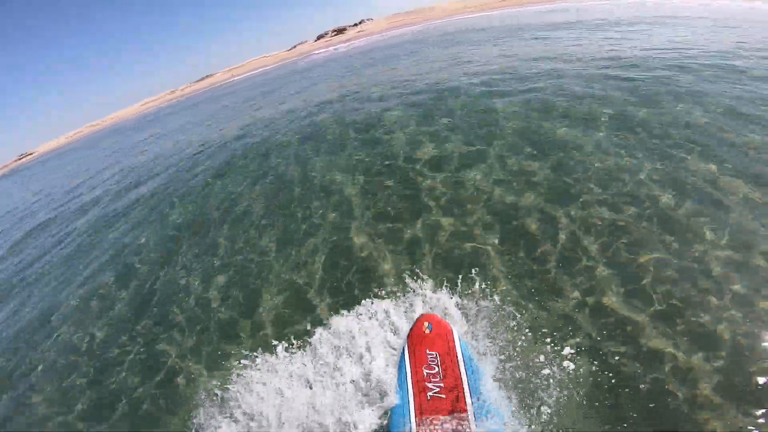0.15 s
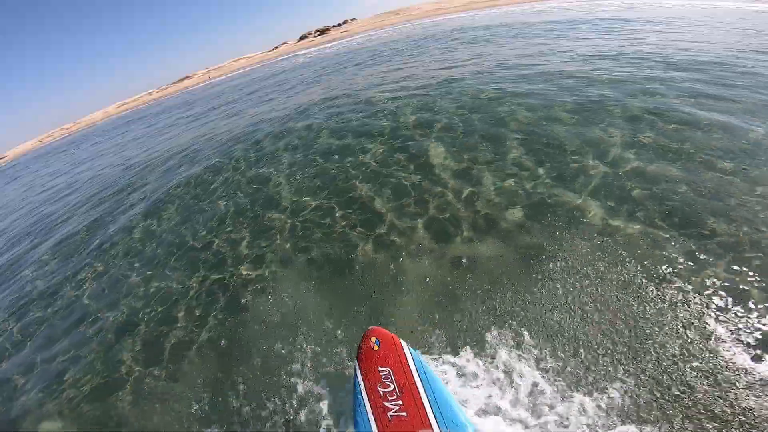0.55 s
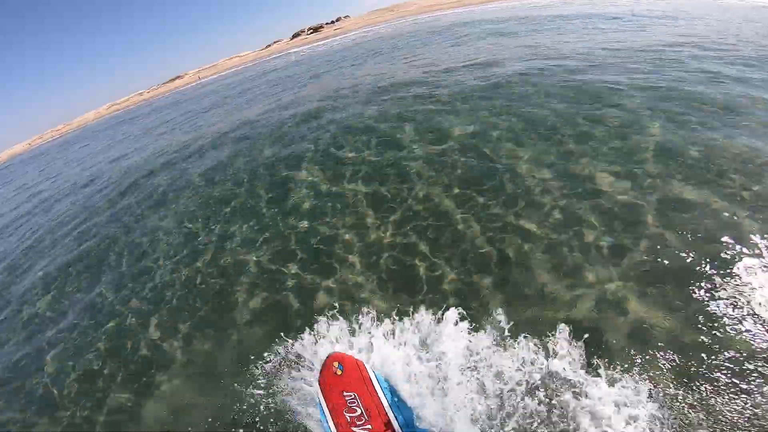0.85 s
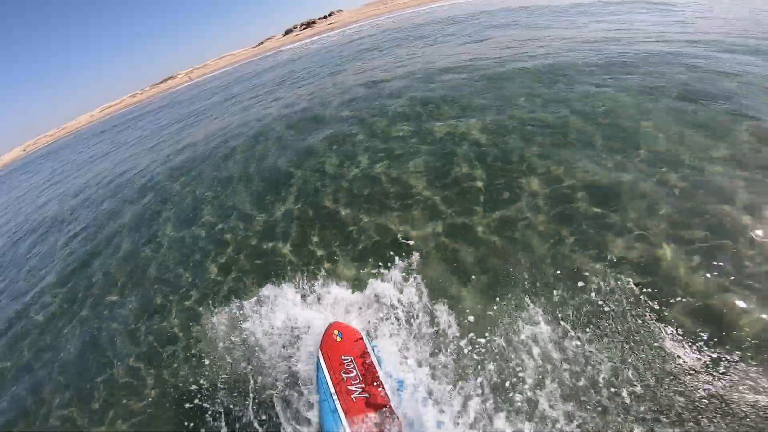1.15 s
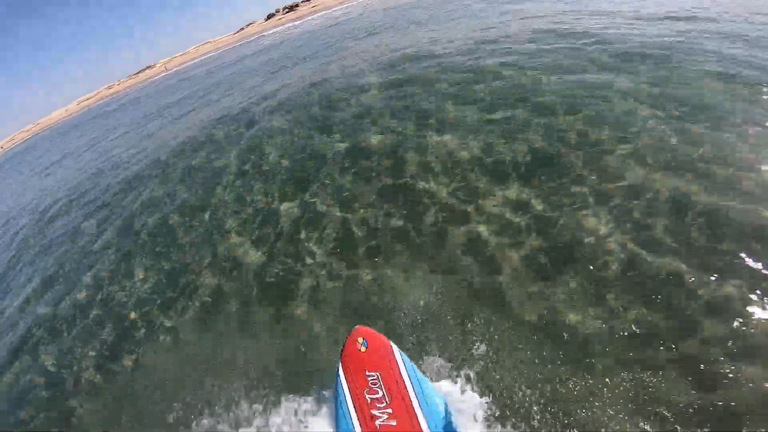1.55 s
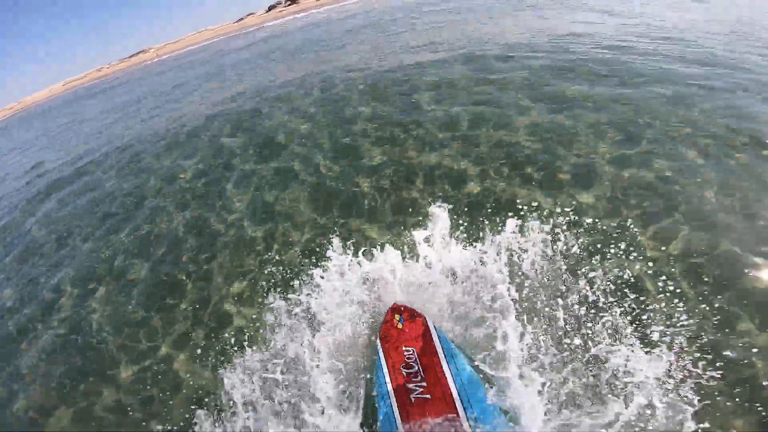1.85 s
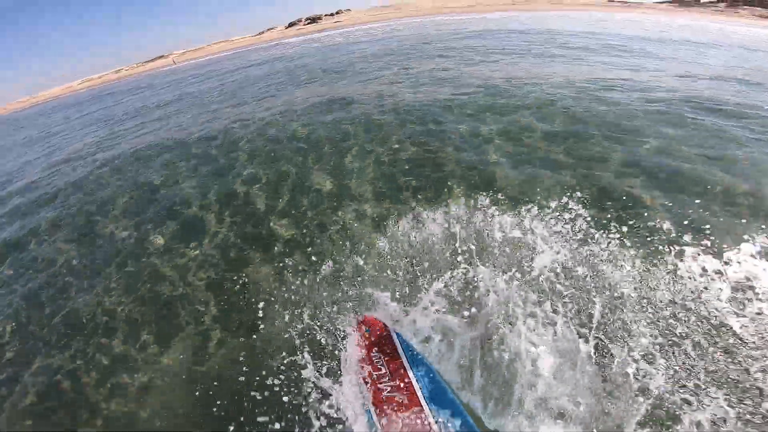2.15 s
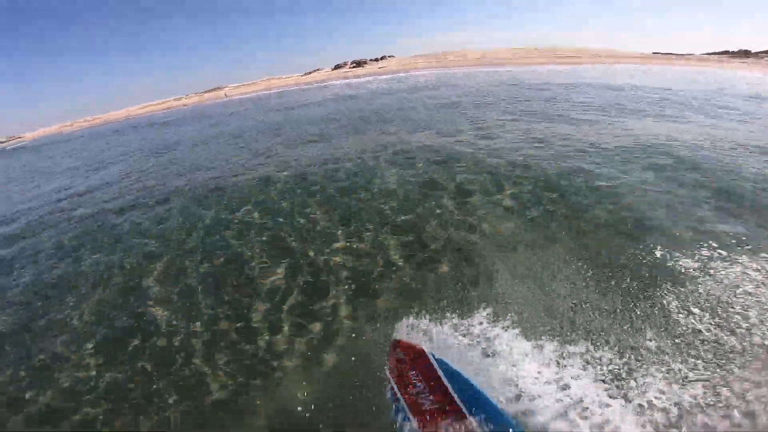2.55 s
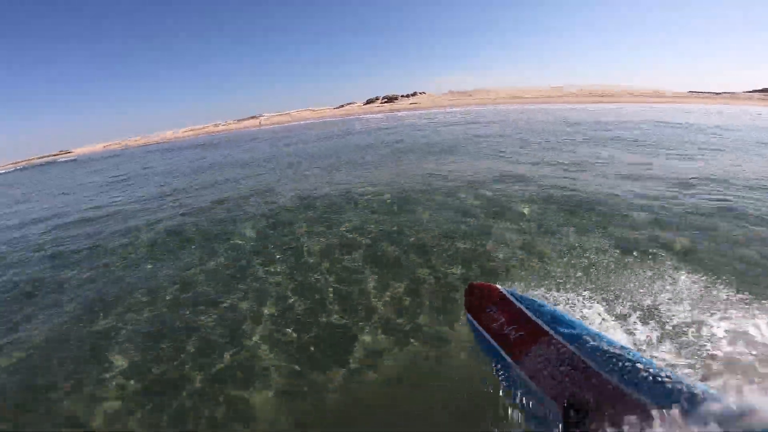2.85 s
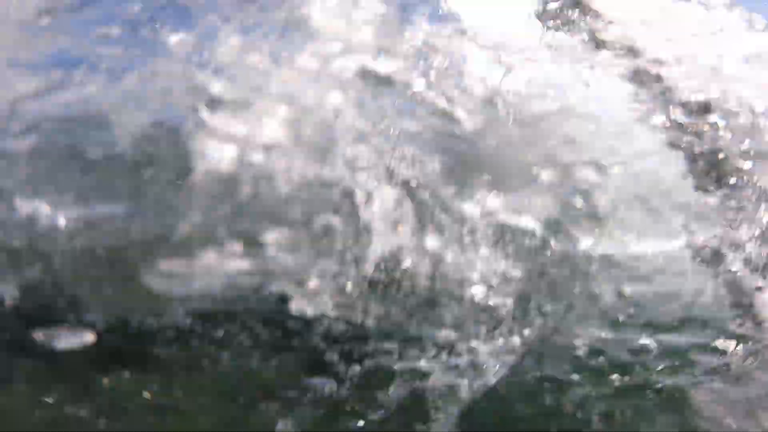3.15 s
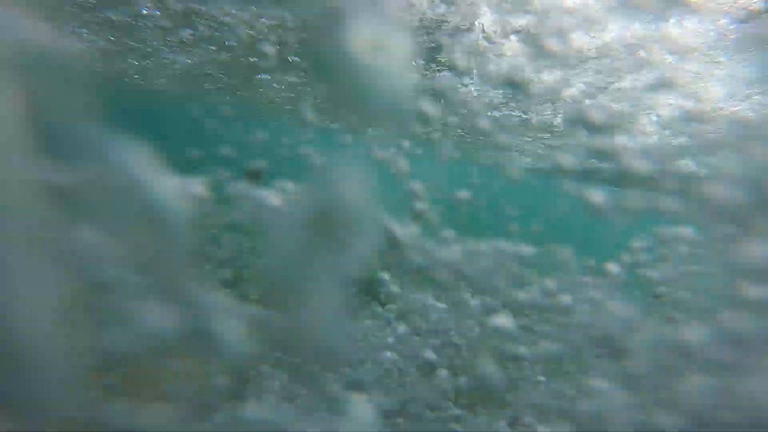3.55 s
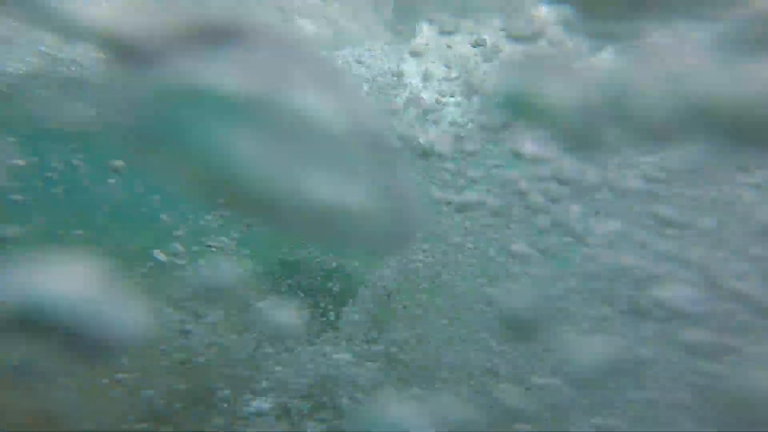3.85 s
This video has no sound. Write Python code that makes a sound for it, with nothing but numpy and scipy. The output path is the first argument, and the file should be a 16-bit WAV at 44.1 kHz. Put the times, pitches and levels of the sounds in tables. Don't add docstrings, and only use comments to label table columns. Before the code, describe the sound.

A surfboard skims shallow sea, its wake churning under steady wind buffeting a sealed onboard camera. Hollow wavelet smacks hit the hull irregularly, strongest near 0.05, 1.2 and 1.75 s. Wind eases towards 3 s. Then a fall: surging water, sharp slaps and a roaring air-pocket boom sinking in pitch. At 3.55 s a heavy thump submerges everything into muffled gurgling, knocks, thinning froth and small ringing bubbles until 4 s.

```python
import sys
import numpy as np
from scipy import signal
from scipy.fft import rfft, irfft
from scipy.io import wavfile

SR = 44100
rng = np.random.default_rng(int(sys.argv[2]) if len(sys.argv) > 2 else 0)


def transcribe(signal):
    frames = np.atleast_2d(signal).T
    limited = np.clip(frames, -1, 1)
    pcm = np.round(limited * 32767).astype(np.int16)
    wavfile.write(sys.argv[1], SR, pcm)


def voltage_ratio(level):
    return 10 ** (np.asarray(level, float) / 20)


N = 176400
T = np.arange(N) / SR
HZ = np.maximum(np.fft.rfftfreq(N, 1 / SR), 1)
FALL = 3 * SR
DIVE_S, CLOSE_S = 3.548, 0.011
SUNK_S = 3.59

# [t/s, level/dB]
WIND = [
    (0.0, -22.5),
    (0.17, -22.5),
    (0.21, -22.5),
    (2.58, -33.5),
    (3.01, -34.5),
    (3.04, -30.5),
    (3.25, -24),
    (3.36, -17),
    (3.5, -18),
]
# [f/Hz, level/dB per Hz]
WIND_COLOUR = [(18, -13.5), (35, -26.5), (70, -7.5), (150, -3.5), (300, -2), (500, -7), (900, -13),
               (2000, -58)]
# [f/Hz, level/dB per Hz]
SHUDDER_COLOUR = [(15, -10), (35, -3.5), (70, -8.5), (120, -25.5)]
# [t/s, level/dB]
MIST = [
    (0.0, -104),
    (0.2, -99),
    (0.4, -93),
    (0.6, -97),
    (0.85, -104),
    (0.93, -94),
    (1.1, -91),
    (1.35, -93),
    (1.45, -110),
]
# [t/s, peak level/dB]
OVERLOAD_TICKS = [(3.5605, -61), (3.567, -60.5), (3.581, -67), (3.5865, -55), (3.5975, -58.5), (3.608, -61),
                  (3.642, -68)]
# [t/s, level/dB, spray share level/dB]
WAKE = [(0.0, -22.5, -20), (0.02, -29, -20), (0.09, -28, -20.5), (0.7, -26, -22), (0.88, -24, -23.5),
        (1.27, -24.5, -22), (1.33, -27.5, -19), (1.61, -27.5, -22.5), (1.76, -23, -25.5),
        (2.0, -28.5, -18.5), (2.77, -26.5, -17), (2.78, -26.5, -16), (3.04, -23, -20.5)]
# [t/s, level/dB, spray share level/dB]
PLUNGE = [
    (3.055, -22.5, -22),
    (3.065, -14, -26.5),
    (3.098, -18.5, -18),
    (3.108, -20, -26),
    (3.14, -16.5, -24),
    (3.291, -20.5, -28.5),
    (3.345, -19.5, -25),
    (3.5, -19, -27),
    (3.536, -14, -27),
]
# [f/Hz, level/dB per Hz]
WAKE_COLOUR = [(100, -23), (300, -8.5), (650, 1), (1350, -1), (1750, -9.5), (2300, -20.5), (3000, -45.5),
               (3800, -61.5)]
# [f/Hz, level/dB per Hz]
SPRAY_COLOUR = [(1500, -7.5), (2200, 1.5), (3200, -7.5), (3800, -16), (5700, -13.5), (7400, -24),
                (9300, -30.5), (11500, -58.5)]
# [t/s, peak level/dB, f/Hz]
SMACKS = [(0.053, -8, 571), (0.35, -13, 670), (0.44, -15, 622), (0.677, -18, 417), (0.966, -15, 773),
          (1.131, -13, 1200), (1.22, -9, 751), (1.686, -10, 616), (1.751, -5, 514), (2.377, -15, 746),
          (3.007, -18, 622)]
# [t/s, level/dB]
FROTH = [
    (3.55, -35),
    (3.565, -34.5),
    (3.61, -35.5),
    (3.65, -42.5),
    (3.69, -36.5),
    (3.71, -43.5),
    (3.75, -44),
    (3.8, -54),
    (3.9, -49),
    (4.0, -66),
]
# [f/Hz, level/dB per Hz]
FROTH_COLOUR = [(600, -6), (1000, 5), (1800, -11.5), (2600, -14.5), (3400, -18), (4400, -18), (5200, -29),
                (6000, -51)]
# [t/s, f/Hz, peak level/dB, time to fall 60 dB t/s]
BUBBLES = [(3.564, 1570, -35, .03), (3.565, 3470, -26, 0.04), (3.566, 4120, -25.5, 0.03),
           (3.567, 2800, -29, 0.035), (3.574, 3440, -38, .12), (3.578, 4520, -37.5, 0.14),
           (3.604, 3480, -41.5, .08), (3.572, 4926, -46, 0.13), (3.605, 4250, -43.5, 0.16),
           (3.61, 2376, -27, 0.035), (3.63, 3870, -42, 0.077), (3.66, 1890, -33, 0.029),
           (3.668, 2752, -31.5, 0.027), (3.679, 4200, -49, 0.27), (3.705, 4200, -48.5, 0.17),
           (3.693, 3200, -44, 0.017), (3.711, 3150, -48, .02), (3.699, 4780, -54, 0.065),
           (3.686, 2200, -35.5, 0.022), (3.678, 4770, -55.5, 0.046), (3.726, 2500, -39, 0.017),
           (3.737, 2750, -38, 0.02), (3.752, 4180, -51, 0.06), (3.816, 4000, -64, 0.037),
           (3.853, 3970, -52, .03), (3.862, 2700, -48, .02), (3.879, 4830, -55, .04),
           (3.859, 3490, -34, 0.021), (3.895, 3900, -51, 0.054), (3.9, 4700, -57, 0.056),
           (3.9, 8060, -64, 0.061), (3.912, 2900, -53, .03), (3.934, 2480, -29, 0.014),
           (3.935, 4240, -58, 0.057)]
# [t/s, level/dB]
GURGLE = [
    (3.45, -15),
    (3.464, -9),
    (3.634, -3.5),
    (3.66, -16.5),
    (3.766, -10.5),
    (3.862, -19),
    (3.876, -11),
    (3.972, -20),
    (4.0, -14),
]
# [f/Hz, level/dB per Hz]
GURGLE_COLOUR = [(18, -27), (50, -3), (120, -1.5), (250, -6), (520, -6.5), (640, -23.5), (1300, -40.5),
                 (2600, -64)]
# [t/s, f/Hz, level/dB, clear tone share level/dB]
POCKET = [
    (3.05, 524, -56, -15),
    (3.15, 480, -24, 7),
    (3.27, 422.7, -18.5, -16.5),
    (3.335, 258.6, -16.5, 8.5),
    (3.41, 257.8, -10, 15),
    (3.44, 260.4, -12.5, -22),
    (3.54, 230.6, -10, -11),
    (3.6, 246, -15.5, 0),
    (3.65, 242.7, -67.5, -1),
]
# [t/s, peak level/dB, brightness level/dB]
SLAPS = [(3.061, -22, -4), (3.0765, -27, -13), (3.088, -23, -8), (3.116, -17.5, -5), (3.135, -23, -9),
         (3.195, -13, -10), (3.265, -18, -11), (3.3376, -21, -10), (3.384, -27, 2), (3.442, -26, -4),
         (3.4814, -8, -9.5), (3.496, -10.5, -10), (3.517, -11, -22), (3.523, -11, -25), (3.532, -22, -16),
         (3.542, -9, -11), (3.5548, -12, -4), (3.564, -21.5, 3), (3.5804, -24, -21), (3.5861, -25.5, -13),
         (3.598, -26, -7), (3.6012, -17, -10), (3.606, -20, -9), (3.627, -24, -10), (3.669, -27, -4),
         (3.686, -24.5, -12), (3.718, -25, -16), (3.726, -26.5, -8), (3.733, -24, -7), (3.7484, -13, -14),
         (3.7555, -14.5, -15.5), (3.7788, -11, -14), (3.7917, -26, -15.5), (3.8, -22.5, -18.5),
         (3.843, -33.5, -14), (3.8588, -25, -7), (3.875, -34, -5), (3.896, -33, -14), (3.912, -24.5, -14),
         (3.919, -35, -12), (3.958, -42, -8)]
# [f/Hz, level/dB per Hz]
SLAP_COLOUR = [(200, -37), (700, 20), (1500, -3.5), (2500, -20), (4000, -35), (6000, -48.5)]
# [f/Hz, level/dB per Hz]
CRACK_COLOUR = [(700, -5), (1800, 4), (3200, -6), (4800, -15), (6400, -15.5), (8600, -32), (10500, -40),
                (16000, -66.5)]
# [t/s, f/Hz, peak level/dB, time to fall 60 dB t/s]
THUMPS = [(3.06, 122, -18, 0.13), (3.13, 44.7, -16, 0.11), (3.225, 30, -16.5, 0.23),
          (3.555, 58, -0.5, 0.14), (3.59, 120, -11.5, 0.45), (3.61, 362, -10, .2), (3.582, 520, -9, .06),
          (3.695, 204, -11, 0.048), (3.745, 440, -14.5, 0.235), (3.82, 118.8, -8, 0.3),
          (3.875, 127.3, -5.5, 0.22), (3.78, 300, -7.5, .08), (3.862, 590, -19, 0.071),
          (3.908, 670, -19.5, 0.068), (3.9, 352, -16, 0.13), (3.938, 323, -7, 0.11),
          (3.935, 118, -7.5, 0.14), (3.98, 189.7, -8.5, 0.43)]


def rms_one(x):
    return x / np.sqrt(np.mean(x ** 2) + 1e-20)


def in_time(rows):
    s, *columns = np.transpose(rows)
    return [np.interp(T, s, column) for column in columns]


def colour(points):
    hz, db = np.transpose(points)
    return voltage_ratio(np.interp(np.log(HZ), np.log(hz), db))


def drift(rate_hz):
    r = np.exp(-80 * np.pi * rate_hz / SR)
    chance = rng.standard_normal(N // 40 + 2002)
    slow = signal.lfilter([1], [1, -2 * r, r * r], chance)[2000:]
    return np.interp(np.arange(N) / 40, np.arange(len(slow)), rms_one(slow))


def filtered(x, order, hz, kind="low"):
    return signal.sosfilt(signal.butter(order, hz, kind, fs=SR, output="sos"), x)


def ring(clicks, hz, t60):
    r, w = voltage_ratio(-60 / (t60 * SR)), 2 * np.pi * hz / SR
    return signal.lfilter([0, np.sin(w)], [1, -2 * r * np.cos(w), r * r], clicks + 1e-18)


def rush(points, together_db, own_db, rate, grain_db):
    grains = rng.standard_normal(N) * voltage_ratio(grain_db * drift(250))
    shaped = rfft(grains) * colour(points)
    together = together_db * drift(rate)
    lowest, highest = np.log2(points[0][0]), np.log2(points[-1][0])
    out = 0
    for centre in np.arange(lowest, highest + 0.5, 0.5):
        band = np.clip(1 - 2 * abs(np.log2(HZ) - centre), 0, 1)
        out = out + irfft(shaped * band, N) * voltage_ratio(together + own_db * drift(rate * 2))
    return rms_one(out)


def tones(rows, rise, attack_cycles, rough, rough_hz):
    out = np.zeros(N)
    flutter = 1 + rough * (drift(rough_hz) + 1j * drift(rough_hz))
    for k, (s, hz, db, t60) in enumerate(rows):
        age = np.maximum(T[FALL:] - s, 0)
        swell = 1 - np.exp(-age * hz / attack_cycles)
        turn = np.exp(2j * np.pi * hz * age * (1 + rise * np.minimum(age / t60, 1)))
        own_flutter = np.roll(flutter, 3001 * k)[FALL:]
        out[FALL:] += voltage_ratio(db - 60 * age / t60) * swell * np.imag(turn * own_flutter)
    return out


def wind():
    gusts = rush(WIND_COLOUR, together_db=1.32, own_db=0.24, rate=19.0, grain_db=0.5)
    shudder = rush(SHUDDER_COLOUR, together_db=0.8, own_db=0.8, rate=3.0, grain_db=0.1)
    level_db, = in_time(WIND)
    port_open = np.clip((DIVE_S - T) / CLOSE_S, 0, 1)
    return (voltage_ratio(level_db) * gusts + voltage_ratio(-51) * shudder) * port_open


def mist():
    hiss = filtered(rng.standard_normal(N), 6, (11900, 14300), "band")
    return voltage_ratio(in_time(MIST)[0]) * rms_one(hiss)


def overload_ticks():
    clicks = np.zeros(N)
    for s, db in OVERLOAD_TICKS:
        clicks[int(s * SR)] = voltage_ratio(db + 19.0)
    return filtered(clicks + 1e-18, 2, 6000, "high")


def wake():
    level_db, spray_db = in_time(list(WAKE) + list(PLUNGE))
    churn = rush(WAKE_COLOUR, together_db=-0.76, own_db=1.58, rate=6.1, grain_db=1.5)
    spray = rush(SPRAY_COLOUR, together_db=0.3, own_db=-0.86, rate=6.0, grain_db=1.0)
    port_open = 1 / (1 + np.exp(np.clip((T - DIVE_S) / CLOSE_S * 4, -50, 50)))
    return voltage_ratio(level_db) * (churn + voltage_ratio(spray_db) * spray) * port_open


def smacks():
    out = np.zeros(N)
    for s, db, hz in SMACKS:
        start = int(s * SR)
        cycles = T[:2000] * hz
        fade = voltage_ratio(db - 0.5 - 60 * cycles / 8.2)
        swell = np.sin(np.pi / 2 * np.minimum(cycles, 1)) ** 2
        tone = np.sin(2 * np.pi * cycles * (1 + 0.04 * cycles))
        out[start:start + len(cycles)] += fade * swell * tone
    return out


def froth():
    crackle = rush(FROTH_COLOUR, together_db=2.0, own_db=3.0, rate=30.0, grain_db=7.0)
    return voltage_ratio(in_time(FROTH)[0]) * (T > FROTH[0][0]) * crackle


def fizz():
    rate = 160 * voltage_ratio(5 * drift(14))
    strength = voltage_ratio(4 * np.minimum(rng.exponential(1, N), 4))
    born = (rng.random(N) < rate / SR) * strength * (T > DIVE_S)
    dealt = rng.integers(0, 16, N)
    rings = 0
    for k, hz in enumerate(np.geomspace(700, 3600, num=16)):
        rings = rings + ring(born * (dealt == k), hz, 13.0 / hz)
    fade_db = 30 * np.maximum(T - DIVE_S, 0)
    return voltage_ratio(-44 - fade_db) * filtered(rings, 2, 2800)


def sizzle():
    bursts = rng.standard_normal(N) * voltage_ratio(5.0 * drift(60))
    hiss = filtered(bursts, 2, (7350, 10040), "band")
    age = np.maximum(T - 3.565, 0)
    return voltage_ratio(-56 - 60 * age / 0.4) * np.minimum(age / 0.002, 1) * rms_one(hiss)


def bubbles():
    return tones(BUBBLES, rise=0.0014, attack_cycles=3.6, rough=0.52, rough_hz=60.4)


def gurgle():
    rumble = rush(GURGLE_COLOUR, together_db=2.2, own_db=2.0, rate=33.0, grain_db=1.5)
    fade_in = np.clip((T - 3.4) / 0.37, 0, 1)
    return voltage_ratio(in_time(GURGLE)[0]) * rumble * fade_in


def pocket():
    hz, level_db, clear_db = in_time(POCKET)
    turn = np.exp(2j * np.pi * np.cumsum(hz) / SR)
    core_hz, broad_hz = 9.1, 78
    core = 1.0 + 0.21 * drift(core_hz) + 0.3j * drift(core_hz)
    broad = drift(broad_hz) + 1j * drift(broad_hz)
    share = voltage_ratio(clear_db) / np.sqrt(1 + voltage_ratio(clear_db) ** 2)
    mixed = 1.35 * share * core + np.sqrt(1 - share ** 2) * broad
    alive = (T > POCKET[0][0]) * (T < POCKET[-1][0])
    return voltage_ratio(level_db) * np.real(turn * mixed) * alive


def slaps():
    dull = irfft(rfft(rng.standard_normal(N)) * colour(SLAP_COLOUR), N)[FALL:]
    bright = irfft(rfft(rng.standard_normal(N)) * colour(CRACK_COLOUR), N)[FALL:]
    muffled = filtered(bright, 8, 3900)
    out = np.zeros(N)
    for s, db, bright_db in SLAPS:
        sunk = s > SUNK_S
        slap_s, crack_s = 0.0059 * (0.6 if sunk else 1), 0.0034
        crack = muffled if sunk else bright
        for noise, length, level_db in ((dull, slap_s, db + 0.5), (crack, crack_s, db + bright_db)):
            age = np.maximum(T[FALL:] - s, 0) / length * 4
            burst = age ** 2 * np.exp(-age) * noise
            out[FALL:] += voltage_ratio(level_db) * burst / np.max(abs(burst))
    return out


def thumps():
    return -tones(THUMPS, rise=0.13, attack_cycles=0.34, rough=0.24, rough_hz=19)


def scene():
    above = wind() + wake() + smacks()
    under = froth() + fizz() + sizzle() + bubbles() + gurgle()
    fall = pocket() + slaps() + thumps()
    return (above + under + fall)[None]


def top_cut(x):
    return signal.sosfilt(signal.butter(12, 15700, fs=SR, output="sos"), x)


def record(dry):
    dip_hz, dip_width_hz, dip_db = 6410, 1120, -11.5
    peak = signal.lfilter(*signal.iirpeak(dip_hz, dip_hz / dip_width_hz, fs=SR), dry)
    dipped = dry - (1 - voltage_ratio(dip_db)) * peak
    faded_in = dipped * np.minimum(T / 0.004, 1)
    heard = filtered(faded_in, 6, 11300) + mist() + overload_ticks()
    limit = 0.94
    mix = limit * heard / (1 + abs(heard / limit) ** 12) ** (1 / 12)
    return top_cut(mix)


dry = scene()
out = record(dry)
transcribe(out)
```